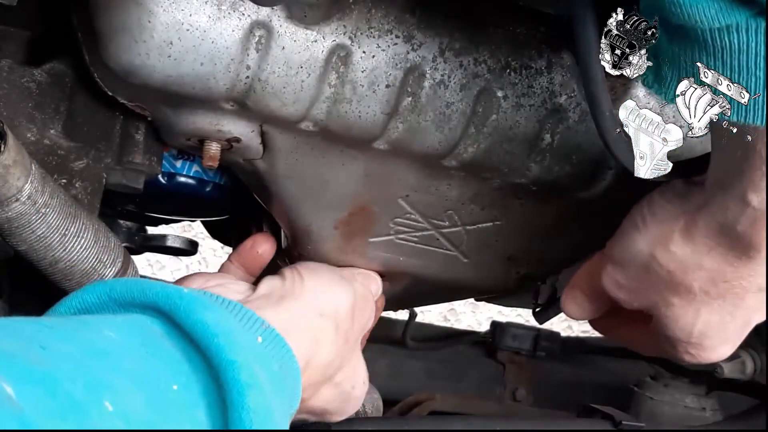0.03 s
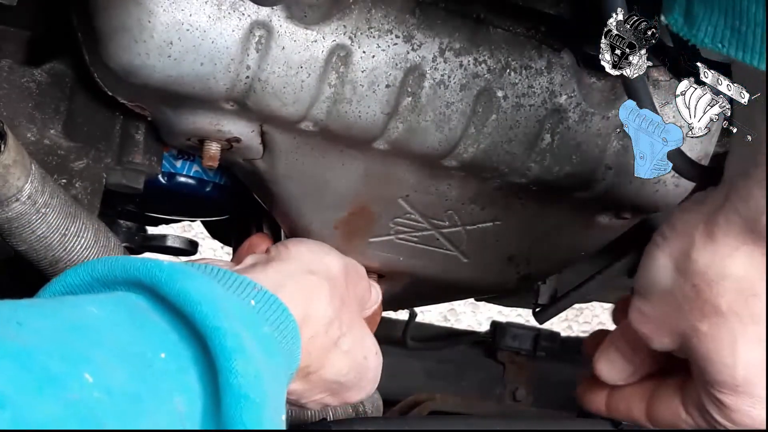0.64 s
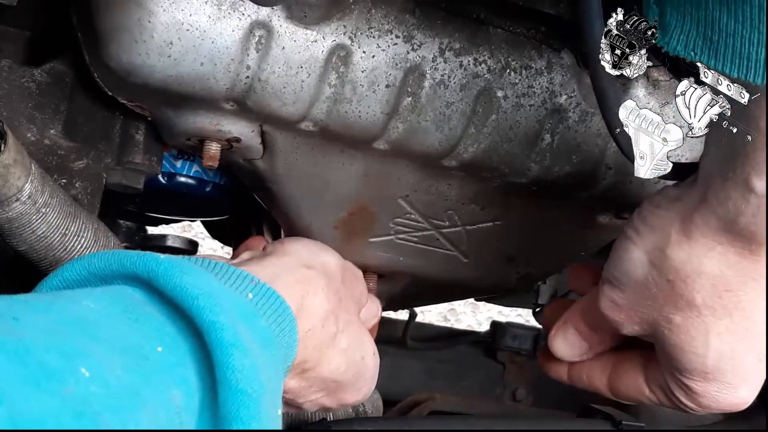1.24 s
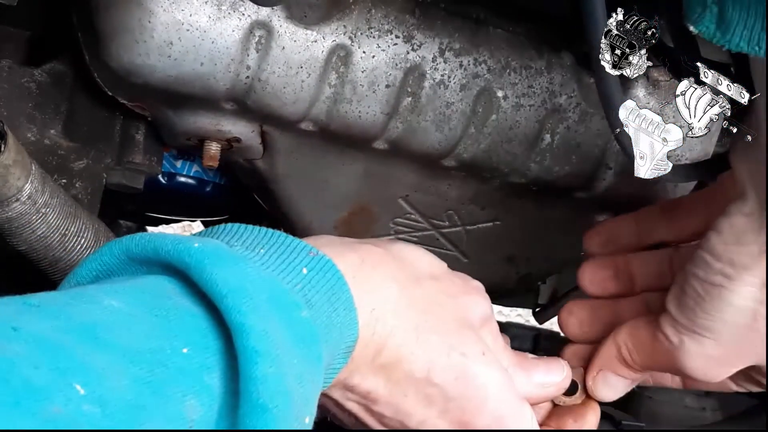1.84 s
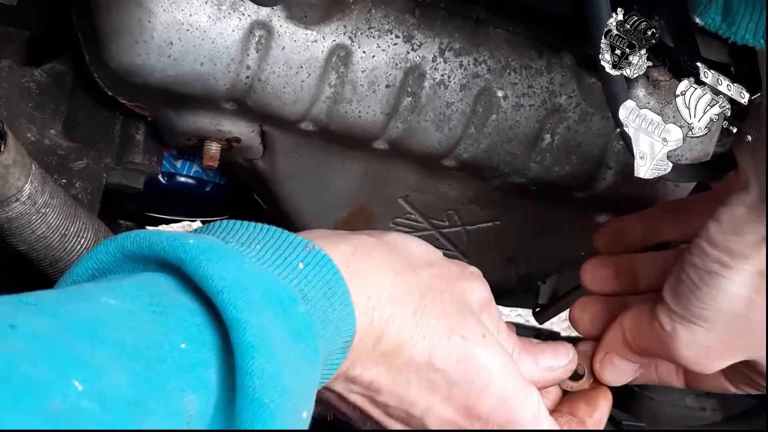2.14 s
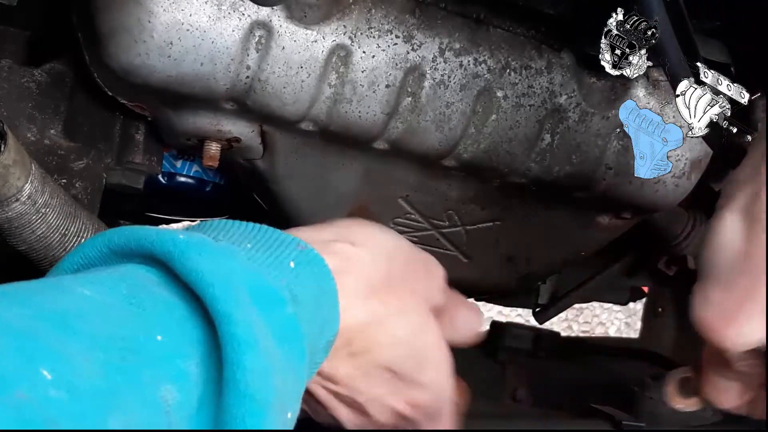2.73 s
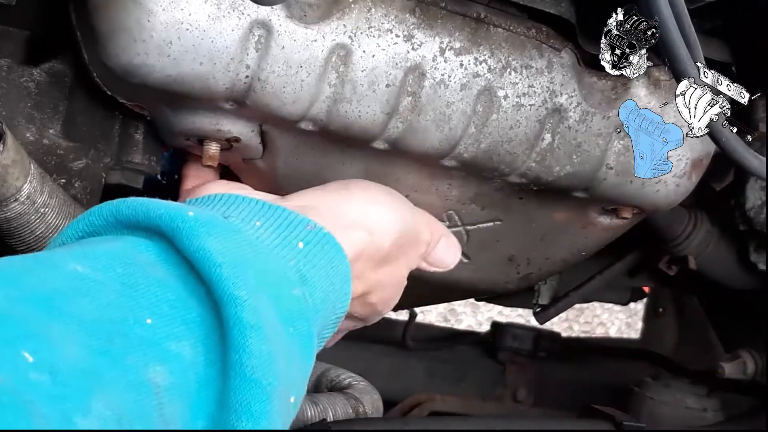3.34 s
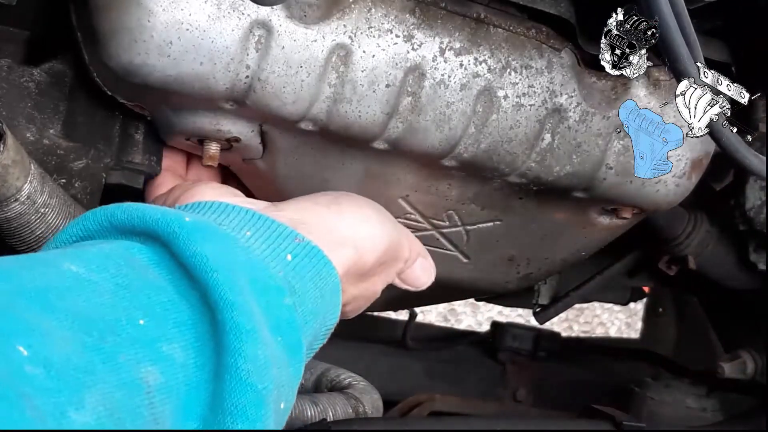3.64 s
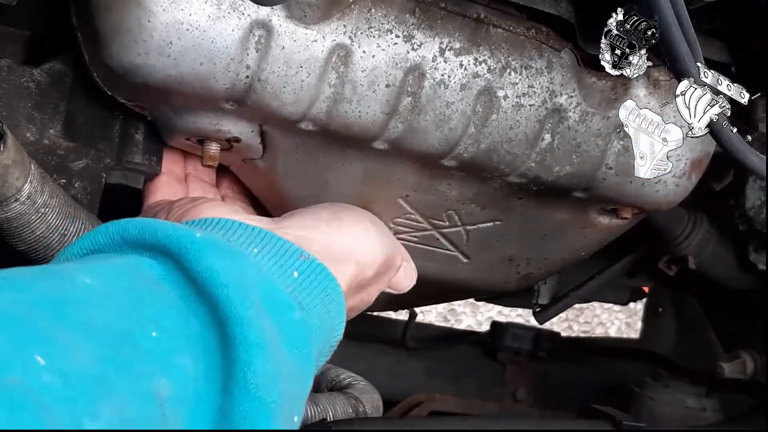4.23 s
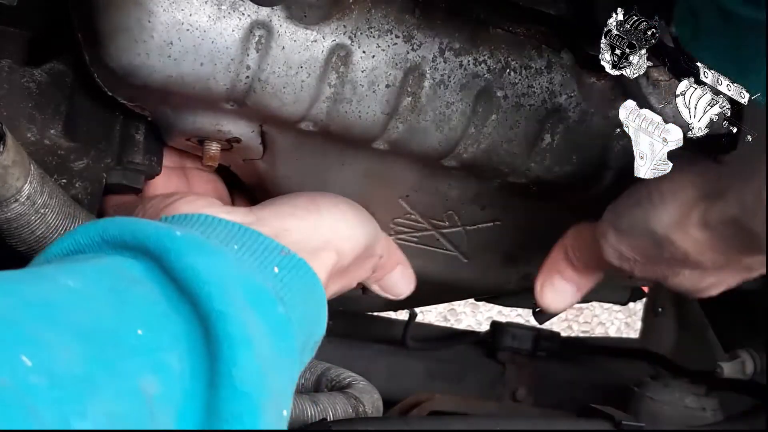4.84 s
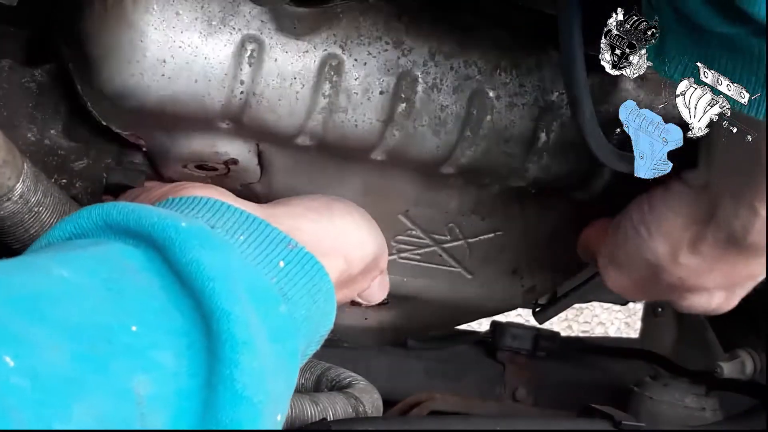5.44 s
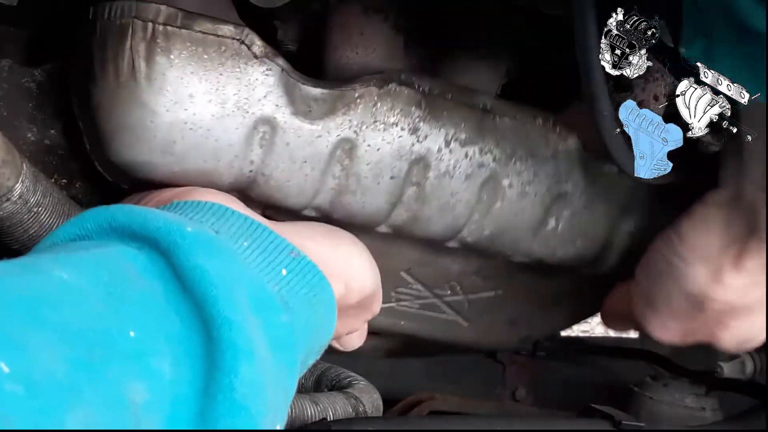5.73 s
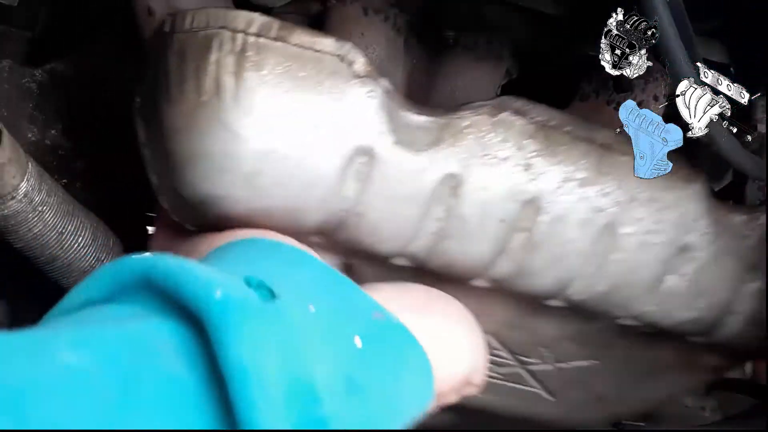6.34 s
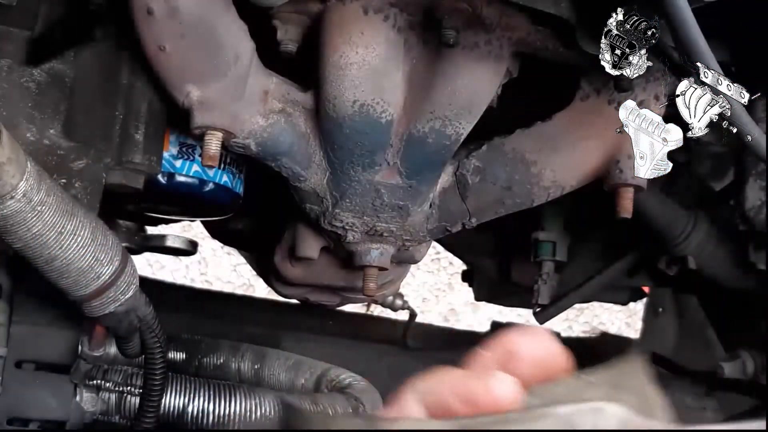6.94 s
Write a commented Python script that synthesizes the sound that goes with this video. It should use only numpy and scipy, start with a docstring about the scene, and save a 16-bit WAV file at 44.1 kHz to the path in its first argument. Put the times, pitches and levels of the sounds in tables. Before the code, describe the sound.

A quiet garage is heard through a close hand-held microphone, with a soft low rumble throughout. Small metal parts tick lightly from about 0.3 to 1.1 seconds. Sparrows chirp faintly outside near 1.5, 2.2, 4 and 5.6 seconds. Around 3.1 seconds fingers tap softly on a thin steel heat shield, then rub it as a fleece sleeve rustles, with a few clicks and a tiny scrape near 3.7 seconds. From 4.8 seconds the shield knocks and scrapes against its studs with short, tinny ringing. The knocks grow louder and peak in a sharp snap at about 5.5 seconds. Between 5.8 and 6.3 seconds an arm bumps the microphone, making strong dull thumps and rumble on the left, while rusty edges scrape and clack. A soft tap follows near 6.4 seconds, and the sleeve swishes over light rubbing on steel around 7 seconds.

```python
"""Knocks, a sharp snap and scrapes: a pressed-steel heat shield is worked off an exhaust manifold.
Hardware ticks and the shield hits its studs, ringing sheet, ribs and shell; rusty edges stick and slip.
Fingers tap and rub the steel, a fleece sleeve rustles, and the arm thumps dully in the left port of a
hand-held microphone. Behind the quiet garage lie a low rumble and sparrows chirping outside."""
import sys
import numpy as np
from scipy import signal
from scipy.fft import rfft, irfft, next_fast_len
from scipy.io import wavfile
from scipy.ndimage import map_coordinates

SR = 44100
rng = np.random.default_rng(int(sys.argv[2]) if len(sys.argv) > 2 else 0)


def unload_audio(sound):
    """Save the sound as a 16-bit wav file, at the path given as the first command line argument."""
    columns = np.transpose(np.atleast_2d(sound))
    # keep every value between -1 and 1, then stretch to whole-number steps
    steps = np.round(np.clip(columns, -1, 1) * 32767)
    wavfile.write(sys.argv[1], SR, steps.astype(np.int16))


N = 312669
TIME_S = np.arange(N) / SR
RING_S = np.arange(SR // 4) / SR  # time axis of one event

# whole-shell flexing: freq_hz, level_db, t60_s
SHELL_MODES = [(213, -2.5, 0.063), (260.6, 7, 0.039), (327, 1, 0.086), (403, -9.5, 0.24), (518.7, 2, 0.15),
               (549, -7, 0.19), (743, -9, 0.078), (964, 4, 0.048)]
# hand and arm strokes: centre_s, length_s, fleece_db, steel_db
ARM_STROKES = [(0.305, 0.073, -65.5, -86), (0.452, 0.54, -77, -82.5), (2.969, 0.056, -63, -85),
               (3.143, 0.09, -66, -81), (3.457, 0.11, -66.5, -61.5), (3.785, 0.068, -64, -62),
               (4.416, 0.055, -56, -57), (4.598, 0.068, -57.5, -54.5), (4.888, 0.16, -62, -57),
               (5.337, 0.095, -57, -58), (5.644, 0.029, -53.5, -55), (6.483, 0.26, -55.5, -62),
               (6.899, 0.052, -47, -66.5), (6.996, 0.059, -53.5, -55.5), (7.08, .06, -67, -62)]
# left-right likeness of close sources: freq_hz, correlation
NEAR_CORRELATION = [(300, 1), (1000, 0.4), (3000, 0.085), (10000, 0.02)]


def knocks(edge_t60_s=0.043, boom_rise_s=0.0014, contact_s=0.00072, spot_db=6, firm_db=-37):
    """Each contact rings the sheet and the struck spot; the whole shell follows a moment later."""
    # start_s, force_db, boom_db, edge_db, spot_hz
    contacts = [(0.281, -62, -63, -54, 4070), (0.294, -61, -80, -52, 4330), (.314, -61, -65, -45.5, 3560),
                (0.605, -69, -59, -70, 5030), (0.853, -71, -85, -76, 4000), (.877, -71, -81, -82, 3840),
                (1.11, -74, -80, -58, 6440), (1.136, -73, -87, -61, 6750), (3.568, -51, -66, -74, 3900),
                (3.734, -48.5, -58, -43, 1610), (3.781, -51, -78, -50, 5340),
                (4.784, -54.5, -57, -40, 6000), (4.931, -41, -70, -48, 1300),
                (4.945, -38.5, -46, -45.5, 1058), (5.024, -45, -36.5, -45.5, 1490),
                (5.071, -59, -49, -49.5, 6900), (5.08, -44.5, -48, -41, 5100),
                (5.109, -48.5, -47, -47, 6780), (5.119, -40.5, -30, -43, 1260),
                (5.4425, -29.5, -34.5, -54, 1033), (5.474, -36.5, -42.5, -44, 1037),
                (5.529, -42.5, -38.5, -47, 1510), (5.5425, -22.5, -27.5, -20, 3766),
                (5.5467, -30.5, -31.5, -43, 3350), (5.5909, -32, -29, -44, 2110),
                (6.031, -41, -65, -43, 2220), (6.2608, -43, -60.5, -48, 1215), (6.309, -42, -67, -62, 1300),
                (6.327, -42, -59, -55, 1260)]
    # spot positions: pitch_hz, left_over_right_db
    spot_sides = [(1000, 6), (2000, 1), (4000, -7)]
    out = np.zeros((2, N))
    for start_s, force_db, boom_db, edge_db, spot_hz in contacts:
        boom = amp(boom_db) * ring(SHELL_MODES) * (1 - np.exp(-RING_S / boom_rise_s))
        edge = amp(edge_db) * tick(force_db, edge_t60_s) * pan(left_db=1.5)
        spot_gain = amp(spot_db + 0.35 * (force_db - firm_db))  # hard blows favour the spot
        patch = spot_gain * spot(spot_hz) * pan(along(spot_sides, spot_hz))
        clack = amp(force_db) * (sheet() + patch)
        attack = 1 - np.exp(-RING_S / contact_s)
        add(out, start_s, (clack + boom + edge) * attack)
    return out * pan(left_db=3)


def sheet(rib_db=-3, clack_t60_s=0.059):
    """Thin steel clacks in a crowd of damped modes, with the ribs ringing through."""
    # crowded sheet modes: freq_hz, density_db
    clack_spectrum = [(150, -25), (600, -9), (1000, -2), (1600, -3), (2100, -1), (2700, -3), (3700, 0),
                      (5000, -2), (6700, -7), (8000, -16), (16000, -26)]
    # stiff ribs and flanges: freq_hz, level_db, t60_s
    rib_modes = [(1035, 6, 0.091), (1276, 2, 0.061), (1458, 7.5, 0.047), (1650, 8, 0.062),
                 (1878, 11, 0.037), (2040, 1.5, 0.14), (2488, 3.5, 0.061), (3082, 5, 0.054),
                 (3300, -3, 0.07), (3390, 1, 0.06), (3640, -2, 0.038), (4080, -37, 0.12),
                 (4040, -19, 0.055), (4505, 10, 0.026), (5050, -41, 0.07), (6100, -41, 0.032),
                 (5940, -31, 0.017), (7130, 10, 0.0061)]
    clack = noise(clack_spectrum, NEAR_CORRELATION, len(RING_S)) * fade(clack_t60_s)
    return clack + amp(rib_db) * ring(rib_modes)


def spot(pitch_hz, spacing=0.0594, t60_s=0.029):
    """The dented patch under a contact rings in a tight cluster of modes."""
    step = np.arange(-2, 3)
    freq_hz = pitch_hz * (1 + spacing * step)
    return ring(np.column_stack([freq_hz, -6 * np.abs(step), np.full(len(step), t60_s)]))


def tick(force_db, t60_s, heavy_db=-25):
    """The hard edge of a contact: a light touch is briefer than a heavy blow, so brighter."""
    # freq_hz, density_db
    edge_spectrum = [(500, -25), (3000, -9), (6000, 0), (11000, 0), (14000, -3), (16000, -7)]
    freq_hz, density_db = np.transpose(edge_spectrum)
    tilt_db_per_octave = 0.2 * (heavy_db - force_db)
    tilted = np.column_stack([freq_hz, density_db + tilt_db_per_octave * np.log2(freq_hz)])
    return noise(tilted, NEAR_CORRELATION, len(RING_S)) * fade(t60_s)


def scrapes(slips_per_s=500, uneven_db=6, swell_power=0.67):
    """Rusty edges stick and slip: tiny blows, too light to wake the shell's deepest modes."""
    # start_s, length_s, grind_db, boom_db, edge_db
    slides = [(3.728, 0.046, -59.5, -68, -53.5), (3.782, 0.032, -56.5, -63, -61.5),
              (4.791, 0.14, -64.5, -66, -57), (5.031, 0.085, -55.5, -54.5, -73),
              (6.006, 0.11, -50, -55, -69.5), (6.043, 0.023, -45, -81, -52),
              (6.15, 0.039, -53.5, -49.5, -64), (6.189, 0.028, -50.5, -51.5, -68),
              (6.261, 0.029, -50, -47.5, -53), (6.308, 0.026, -44, -44, -48.5)]
    out = np.zeros((2, N))
    upper_shell = SHELL_MODES[len(SHELL_MODES) // 2:]
    for start_s, length_s, grind_db, boom_db, edge_db in slides:
        swell = np.abs(np.sin(np.pi * np.minimum(RING_S / length_s, 1))) ** swell_power
        slipping = rng.random(len(RING_S)) < slips_per_s / SR
        slips = slipping * amp(uneven_db * rng.standard_normal(len(RING_S))) * swell
        edge = tick(grind_db, t60_s=0.046)
        for level_db, body in (grind_db, sheet()), (boom_db, ring(upper_shell)), (edge_db, edge):
            sound = signal.fftconvolve(slips[None], body, axes=1)
            duty = length_s * SR / sound.shape[1]  # sets the level over the stroke alone
            add(out, start_s, amp(level_db) * unit(sound) * np.sqrt(duty))
    return out * pan(left_db=2)


def finger_taps(rise_s=0.00075):
    """A soft fingertip wakes a pair of low modes and damps them."""
    # start_s, level_db, pitch_hz
    taps = [(3.076, -44.5, 312), (3.113, -48.5, 312), (6.445, -46, 313)]
    out = np.zeros((2, N))
    for start_s, level_db, pitch_hz in taps:
        modes = [(pitch_hz, 0, 0.045), (pitch_hz * 1.14, -9, 0.03)]
        add(out, start_s, amp(level_db) * ring(modes) * (1 - np.exp(-RING_S / rise_s)))
    return out


def rubbing(grain_db=3, drift_db=4):
    """Hand friction feeds the sheet; the colour drifts as the touch moves between places."""
    out = np.zeros((2, N))
    for _place in range(3):
        friction = rng.standard_normal(N)
        friction *= amp(grain_db * wobble(rate_hz=240) + drift_db * wobble(rate_hz=7))
        out += unit(signal.oaconvolve(friction[None], sheet(), axes=1)[:, :N])
    level = effort([steel_db for *_, steel_db in ARM_STROKES], drag_gain_db=0)
    return level * unit(out) * pan(left_db=2)


def sleeve(grain_db=2, flutter_db=1):
    """Fleece brushes along, fibre by fibre."""
    # freq_hz, density_db
    fleece_spectrum = [(500, -18.5), (1100, -9.5), (2500, -4.5), (5000, -1.5), (8000, -1), (11000, 0),
                       (15000, 6), (16000, -6)]
    grain = unit(amp(grain_db * wobble(rate_hz=880) + flutter_db * wobble(rate_hz=16)))
    level = effort([fleece_db for _, _, fleece_db, _ in ARM_STROKES], drag_gain_db=1.5)
    return level * grain * noise(fleece_spectrum, NEAR_CORRELATION, N) * pan(left_db=3)


def effort(strokes_db, drag_gain_db, roundness=1.42):
    """Friction envelope: each stroke swells and fades over the arm's drag."""
    # drag between strokes: time_s, level_db
    drag = [(0.0, -79.5), (0.47, -90.5), (0.79, -85.5), (2.33, -88.5), (3.16, -74), (3.81, -82.5),
            (4.25, -82), (5.03, -65), (5.9, -63), (6.3, -61.5), (6.81, -82), (7.09, -61)]
    power = amp(np.interp(TIME_S, *np.transpose(drag)) + drag_gain_db) ** 2
    for (centre_s, length_s, *_), level_db in zip(ARM_STROKES, strokes_db):
        power += amp(level_db) ** 2 * np.exp(-np.abs(2 * (TIME_S - centre_s) / length_s) ** roundness)
    return np.sqrt(power)


def handling(thump_hz=166.5, half_width_s=0.0065, rumble_gain_db=5.5, right_db=-27):
    """The arm jostles the microphone: dull thumps and rumble, nearly all in the left port."""
    # centre_s, level_db
    thumps = [(5.826, -35.5), (5.932, -22.5), (5.98, -21.5), (6.058, -26), (6.094, -26), (6.182, -29.5),
              (6.249, -31), (6.55, -47.5)]
    # time_s, level_db
    rumble_levels = [(5.68, -62), (5.84, -49), (5.888, -56.5), (5.928, -36.5), (6.164, -49), (6.24, -47),
                     (6.388, -58), (6.41, -84), (6.45, -71)]
    # freq_hz, density_db
    rumble_spectrum = [(20, -21), (45, -3.5), (100, 3), (200, -7), (350, -9.5), (600, -29), (1500, -46)]
    out = np.zeros((2, N))
    offset_s = RING_S - RING_S.mean()
    window = np.exp(-(offset_s / half_width_s) ** 2)
    for centre_s, level_db in thumps:
        push = np.cos(2 * np.pi * (thump_hz * offset_s + rng.random())) * window
        add(out, centre_s - RING_S.mean(), amp(level_db) * push)
    rumble_db = np.interp(TIME_S, *np.transpose(rumble_levels), left=-np.inf, right=-np.inf)
    out += amp(rumble_db + rumble_gain_db) * noise(rumble_spectrum, correlation=[(100, 1.0)], size=N)
    return out * amp([[0], [right_db]])


def sparrows(overtone_db=-21, direct_db=-4, echo_db=-2, swell_power=0.44, bend_power=3.4):
    """Raspy whistles, falling faster towards their end, blurred by the yard."""
    # start_s, length_s, start_hz, level_db, fall_octaves
    chirps = [(1.446, 0.033, 4390, -61.5, 0.093), (1.476, 0.089, 4307, -58, 0.43),
              (2.168, 0.07, 3835, -68.5, 0.81), (2.243, 0.041, 3740, -69, 0.77),
              (3.963, .09, 3810, -69, .45), (4.049, 0.045, 3620, -67, .06), (5.619, 0.085, 4260, -57, 0.16)]
    # freq_hz, t60_s
    yard_decay = [(2000, 0.33), (4000, 0.29), (9000, 0.24)]
    out = np.zeros((1, N))
    for start_s, length_s, start_hz, level_db, fall_octaves in chirps:
        progress = RING_S[RING_S < length_s] / length_s
        rasp = 0.07 * wobble(rate_hz=700, size=len(RING_S))[:len(progress)]
        pitch_hz = start_hz * 2 ** (-fall_octaves * progress ** bend_power) * (1 + rasp)
        phase = 2 * np.pi * np.cumsum(pitch_hz) / SR
        whistle = np.sin(phase) + amp(overtone_db) * np.sin(2 * phase)
        add(out, start_s, amp(level_db) * np.sin(np.pi * progress) ** swell_power * whistle)
    return (amp(direct_db) * out + amp(echo_db) * echo(out, yard_decay)) * pan(left_db=4.5)


def background(waver_db=1.2):
    """A low background hush that swells softly twice, over a low drone."""
    # time_s, hush_db, drone_db
    levels = [(0, -64, -67), (1.4, -66, -68), (1.7, -67, -74), (2.7, -66.5, -78), (3.4, -60.5, -91),
              (4.2, -65, -72.5), (5.002, -57.5, -79), (7.09, -65.5, -60.5)]
    # freq_hz, density_db
    hush_spectrum = [(12, -50), (20, -23), (91, -1.5), (222, -7), (255, -13), (285, -5.5), (542, -9.5),
                     (590, -12), (1220, -16), (1860, -40.5), (4060, -40), (5850, -42), (8180, -35.5),
                     (14700, -45.5), (16000, -61)]
    # freq_hz, density_db
    drone_spectrum = [(25, -13), (60, -9), (90, -0.5), (140, -5), (250, -19), (1000, -71)]
    # left-right likeness: freq_hz, correlation
    correlation = [(60, 0.99), (180, 0.95), (550, 0.43), (1650, -0.51), (4970, -0.28), (15000, 0.11)]
    time_s, hush_db, drone_db = np.transpose(levels)
    hush_gain = amp(np.interp(TIME_S, time_s, hush_db) + waver_db * wobble(rate_hz=5.47))
    hush = hush_gain * noise(hush_spectrum, correlation, N)
    drone = amp(np.interp(TIME_S, time_s, drone_db)) * noise(drone_spectrum, correlation, N)
    return hush + drone


def ring(modes, scatter_db=2.5):
    """Struck modes starting near rms 1; higher ones reach the two ports out of step."""
    freq_hz, level_db, t60_s = np.transpose(modes)
    scatter, side, polarity = rng.standard_normal((len(freq_hz), 3)).T
    gain = amp(level_db + scatter_db * scatter)
    skew_rad = stereo_angle(NEAR_CORRELATION, freq_hz) * np.sign(side)
    phase = 2 * np.pi * freq_hz[:, None] * RING_S + np.array([skew_rad, -skew_rad])[..., None]
    waves = np.sin(phase) * fade(t60_s[:, None])
    return np.sqrt(2) * (gain * np.sign(polarity) / np.linalg.norm(gain)) @ waves


def noise(spectrum, correlation, size):
    """Coloured stereo noise of rms 1."""
    fft_size = next_fast_len(size)
    freq_hz = np.fft.rfftfreq(fft_size, 1 / SR)
    angle_rad = stereo_angle(correlation, freq_hz)
    coloured = rfft(rng.standard_normal((2, fft_size))) * amp(along(spectrum, freq_hz))
    mid, side = irfft(coloured * [np.cos(angle_rad), np.sin(angle_rad)], fft_size)[:, :size]
    return unit(np.array([mid + side, mid - side]))


def echo(sound, decay):
    """A stereo tail, each frequency dying at its own rate."""
    freq_hz, time_s, bins = signal.stft(rng.standard_normal((2, SR // 2)), SR, nperseg=256)
    envelope = np.exp(-np.log(1000) * time_s / along(decay, freq_hz)[:, None])
    tail = signal.istft(bins * envelope, SR, nperseg=256)[1]
    return signal.fftconvolve(sound, tail / np.linalg.norm(tail[0]), axes=1)[:, :N]


def amp(db):
    """Decibels to gain."""
    return 10 ** (np.asarray(db) / 20)


def unit(x):
    """Scale to rms 1."""
    return x / np.sqrt(np.mean(x ** 2) + 1e-20)


def along(points, freq_hz):
    """Read (freq_hz, value) points on a log axis."""
    knots_hz, values = np.transpose(points)
    return np.interp(np.log(freq_hz + 1), np.log(knots_hz + 1), values)


def stereo_angle(correlation, freq_hz):
    """Mid-side angle in radians for a left-right correlation curve."""
    return np.arccos(np.clip(along(correlation, freq_hz), -1, 1)) / 2


def fade(t60_s):
    """Decay of 60 dB in t60_s."""
    return np.exp(-np.log(1000) * RING_S / t60_s)


def pan(left_db):
    """Channel gains, left over right by left_db."""
    return amp(np.array([[left_db], [-left_db]]) / 2)


def add(track, start_s, sound):
    """Mix a sound in at start_s."""
    part = track[:, round(start_s * SR):][:, :sound.shape[-1]]
    part += sound[..., :part.shape[-1]]


def wobble(rate_hz, size=N):
    """Smooth random curve with knots at rate_hz."""
    knots = rng.standard_normal(int(size * rate_hz / SR) + 4)
    return map_coordinates(knots, [np.arange(size) * rate_hz / SR])


def scene(echo_db=-14.5):
    """Metal in the garage, with the arm, the birds and the background."""
    # freq_hz, t60_s
    garage_decay = [(200, 0.31), (1000, 0.22), (4000, 0.1), (14000, 0.087)]
    metal = knocks() + scrapes() + finger_taps()
    garage = amp(echo_db) * echo(metal, garage_decay)
    return metal + garage + rubbing() + sleeve() + handling() + sparrows() + background()


def record(dry, top_hz=15900):
    """The microphone colours the treble and passes nothing above its band limit."""
    # presence peak: freq_hz, gain_db
    presence = [(4500, 0), (6600, 3.5), (7600, -1.5), (10000, 0)]
    fft_size = next_fast_len(N + SR // 2)
    freq_hz = np.fft.rfftfreq(fft_size, 1 / SR)
    response = amp(along(presence, freq_hz)) * (freq_hz < top_hz)
    return irfft(rfft(dry, fft_size) * response, fft_size)[:, :N]


dry = scene()
out = record(dry)
unload_audio(out)
```